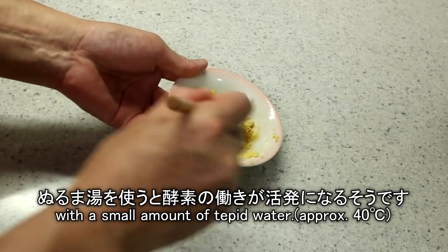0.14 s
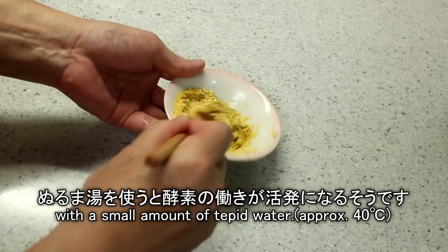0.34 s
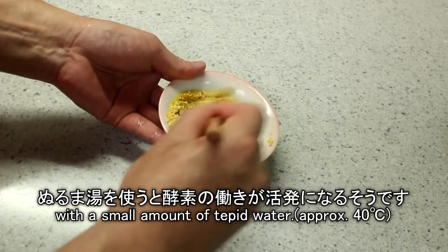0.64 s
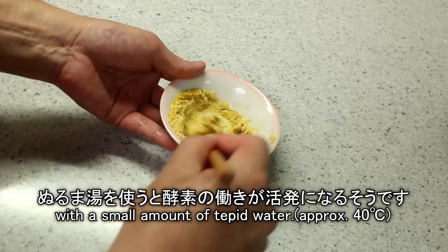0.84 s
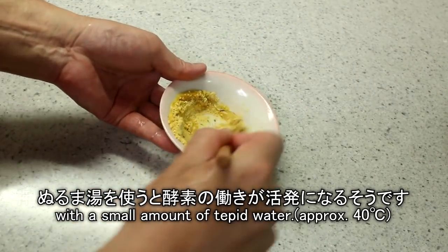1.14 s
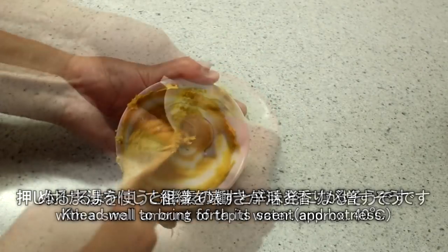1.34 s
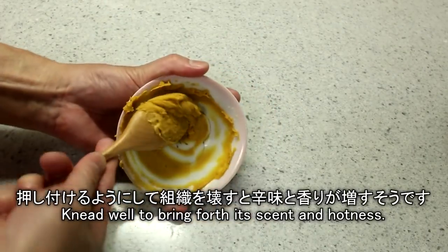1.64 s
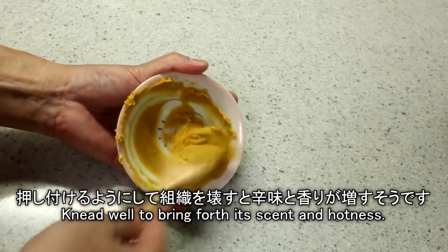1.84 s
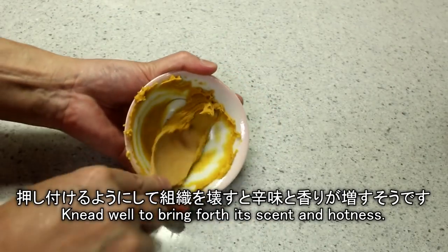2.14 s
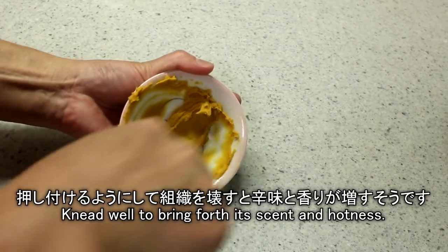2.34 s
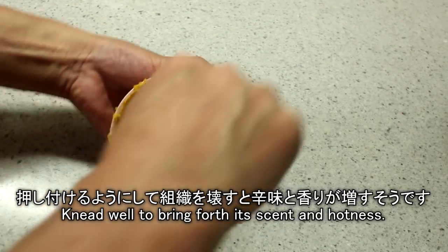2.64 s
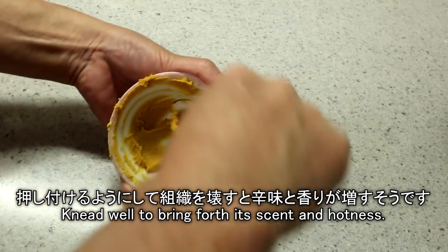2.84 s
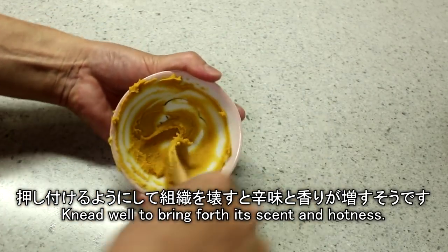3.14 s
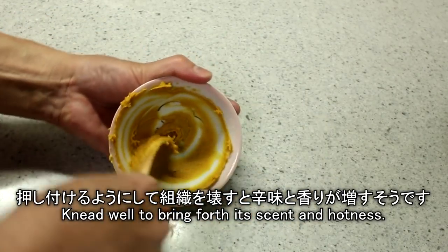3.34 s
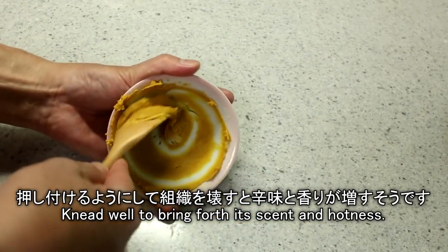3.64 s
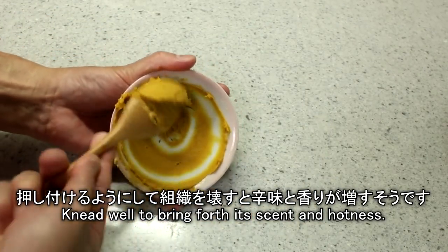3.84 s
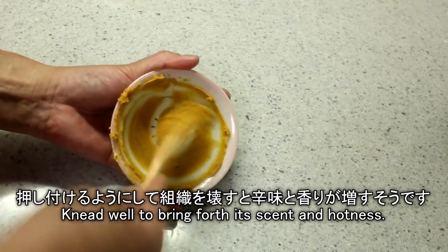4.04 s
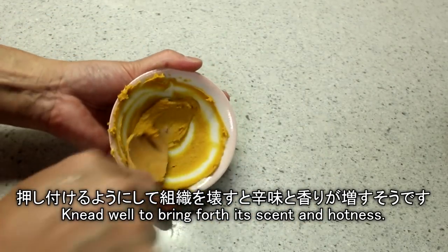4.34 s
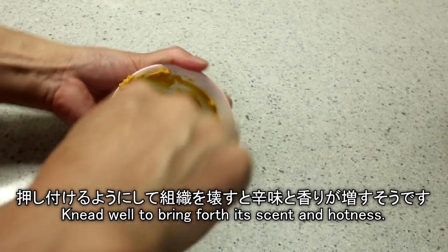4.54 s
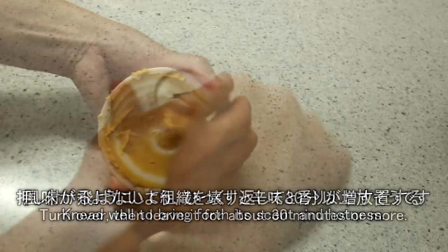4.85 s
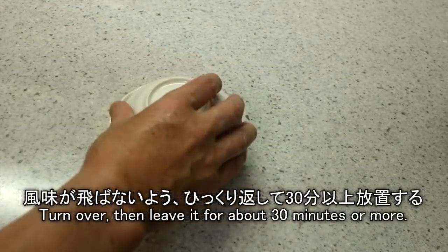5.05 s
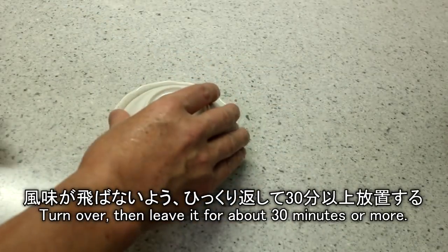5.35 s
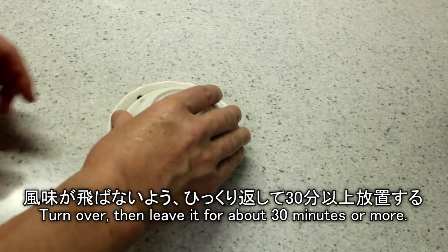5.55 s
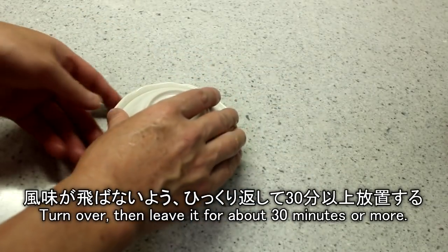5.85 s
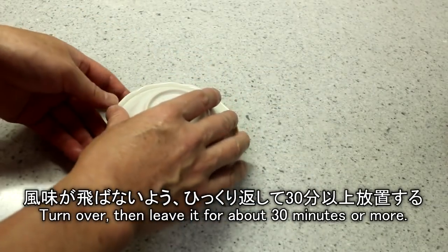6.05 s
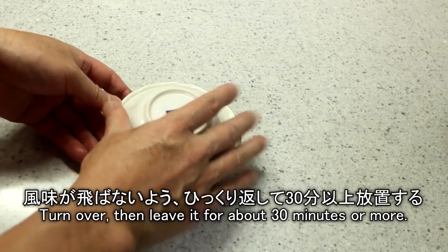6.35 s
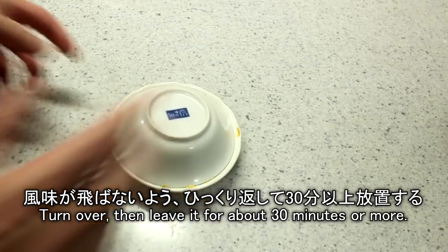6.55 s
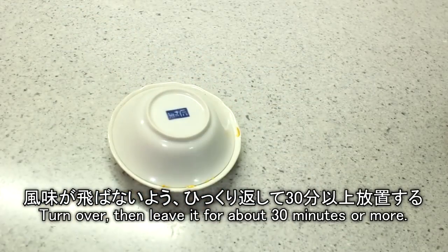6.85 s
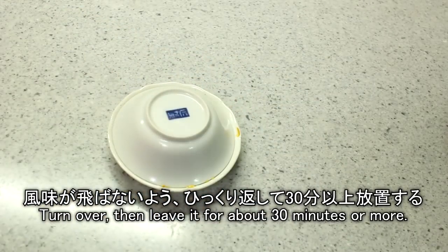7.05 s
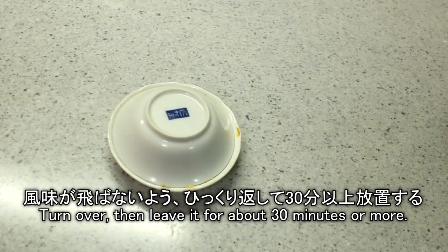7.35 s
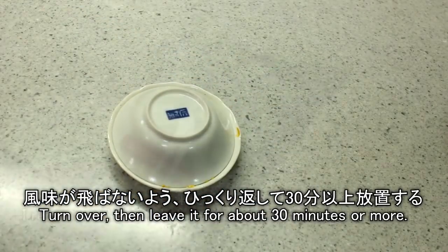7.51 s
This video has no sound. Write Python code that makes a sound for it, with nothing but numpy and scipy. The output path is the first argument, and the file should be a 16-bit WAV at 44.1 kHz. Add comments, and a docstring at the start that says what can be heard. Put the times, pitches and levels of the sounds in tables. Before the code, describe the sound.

Close up in a quiet kitchen with low appliance hum and faint hiss, a wooden spoon kneads thick paste in a small ceramic bowl. Soft wet crackles and tiny sharp pops mix with short, gritty, slightly hollow scrapes. Then the bowl is turned over, its rim clacking loudly twice on the hard counter, followed by dull knocks, light ticks and soft grating. Finally, a faint rustle as the arms withdraw.

```python
"""In a quiet kitchen with appliance hum and hiss, paste is kneaded in a small ceramic bowl, close to the microphone.
The paste smears and crackles (random grains), air pockets pop (decaying noise bursts), and meanwhile a wooden
spoon drags over the glaze (stick-slip grains through resonances). The bowl is turned over: its rim clatters on the
countertop (decaying modes), with dull knocks (modes and noise) and soft grating as it is nudged into place.
Last, the arms draw back with a soft rustle (coloured grains)."""
import sys
import numpy as np
from scipy import signal
from scipy.fft import rfft, irfft
from scipy.io import wavfile
from scipy.ndimage import map_coordinates

SR = 44100
rng = np.random.default_rng(int(sys.argv[2]) if len(sys.argv) > 2 else 0)


def wrap_up_sound(samples):
    """Save the sound to the file named by the first command line argument, as 16-bit audio."""
    columns = np.atleast_2d(samples).T
    # keep every value between -1 and 1, then stretch to whole-number steps
    tamed = np.clip(columns, -1, 1)
    steps = np.round(tamed * 32767).astype(np.int16)
    wavfile.write(sys.argv[1], SR, steps)


N = 338688
FREQS = np.fft.rfftfreq(N, 1 / SR)
RING = np.arange(SR // 2) / SR  # time since a contact, in s

# likeness of left and right in the diffuse room sound: freq_hz, likeness (0-1)
ROOM_LIKENESS = [(60, .65), (400, 0.53), (1400, 0.28), (4000, 0.042), (15000, 0.044)]
# likeness of left and right for rubbing in or under the bowl: freq_hz, likeness (0-1)
SPOON_LIKENESS = [(100, .6), (1400, 0.85), (3000, 0.71), (7000, 0.25), (15000, 0.235)]


def amp(db):
    """Level in decibels to a pressure ratio."""
    return 10 ** (np.asarray(db) / 20)


def evened(x):
    """Normalises the mean power: scales to rms 1."""
    return x / np.sqrt(np.mean(x ** 2) + 1e-20)


def read(points, hz):
    """Interpolates a spectrum on a log-frequency axis, as pitch is heard."""
    f, value = np.transpose(points)
    return np.interp(np.log(hz + 1), np.log(f + 1), value)


def bumps(peaks):
    """Broad damped resonances, as a sum of bell-shaped dB curves."""
    return sum(db / (1 + (2 * (FREQS - hz) / width) ** 2) for hz, width, db in peaks)


def add(mix, s, sound):
    """Superposition: mixes a sound in at time s, cut off at the end."""
    part = mix[:, max(round(s * SR), 0):][:, :sound.shape[-1]]
    part += sound[..., :part.shape[1]]


def band(x, low_hz, high_hz, order=3):
    """Band limiting by a causal high-pass and low-pass."""
    for hz, kind in (low_hz, "high"), (high_hz, "low"):
        x = signal.sosfilt(signal.butter(order, min(hz, SR / 2 - 100), kind, fs=SR, output="sos"), x)
    return x


def stereo(pair, colour_db, likeness):
    """Interaural coherence: colours two unrelated signals and makes them partly alike."""
    left, other = rfft(pair) * amp(colour_db)
    same = np.clip(read(likeness, FREQS), -1, 1)
    right = same * left + np.sqrt(1 - same ** 2) * other
    return evened(irfft(np.array([left, right]), N))


def grains(per_s, spread_db):
    """Friction as tiny slips at random moments: most are small, a few stand out."""
    size = amp(spread_db * np.minimum(rng.exponential(1, N), 5))
    happens = rng.random(N) < per_s / SR
    return size * happens * rng.standard_normal((2, N))


def wander(hz, size=N):
    """Low-passed noise of rms 1: smooth chance that weakens above about hz."""
    f = np.fft.rfftfreq(size, 1 / SR)
    return evened(irfft(rfft(rng.standard_normal(size)) / (1 + (f / hz) ** 2), size))


def flutter(depth_db, hz):
    """Amplitude modulation by the uneven pressure of the hand."""
    return amp(depth_db * wander(hz))


def travel(pair, share, hz):
    """Time warping: resonances drift as the contact point moves round the bowl."""
    at = np.arange(N) + np.cumsum(share * wander(hz))
    return np.array([map_coordinates(x, [at], order=5, mode="mirror") for x in pair])


def movement(length, db, swell_db, attack_s, release_s):
    """Envelope of one movement of the hand: it takes hold, leans in or eases off, and lets go."""
    t = np.arange(0, length + 6 * release_s, 1 / SR)
    along = np.minimum(t / length, 1)
    # the hand is fastest, and so loudest, halfway through
    arch_db = 2.5 * (np.sin(np.pi * along) - 2 / np.pi)
    hold = amp(db + swell_db * (along - .5) + arch_db)
    release = np.exp(-np.maximum(t - length, 0) / release_s)
    return np.minimum(t / attack_s, 1) * hold * release


def movements(rows, attack_s, release_s):
    """Superposed envelopes of a series of movements, with silence outside them."""
    gain = np.zeros((1, N))
    for s, length, db, swell_db in rows:
        add(gain, s, movement(length, db, swell_db, attack_s, release_s))
    return gain


def kitchen(x, early_db, tail_db):
    """Reverberation: quick reflections off the counter and wall, then a faint short tail."""
    # reverberation time of the tail: freq_hz, t60_s
    decay_times = [(150, 0.45), (600, 0.52), (2000, 0.14), (6000, 0.11), (15000, 0.061)]
    noise = rng.standard_normal((2, 2, len(RING)))
    early = noise[0] * (RING > .002) * np.exp(-RING / 0.011)
    # each frequency of the tail dies at its own rate
    hz, t, z = signal.stft(noise[1] * (RING > .008), SR, nperseg=256)
    fading = z * amp(-60 * t / read(decay_times, hz)[:, None])
    tail = signal.istft(fading, SR, nperseg=256)[1][:, :len(RING)]
    echo = (amp(early_db) * evened(early) + amp(tail_db) * evened(tail)) / np.sqrt(len(RING))
    return x + signal.fftconvolve(x, echo, axes=1)[:, :N]


def room_tone():
    """Stationary coloured noise: appliance rumble, hum and whine, and microphone hiss."""
    # background spectrum: freq_hz, level_db
    tone_colour = [(15, -62), (25, -37), (43, -13), (86, -2), (120, -2), (211, -3), (333, -7), (392, -6),
                   (473, -8), (620, -9.5), (857, -11.5), (1250, -13), (1550, -14), (1730, -15.5),
                   (15800, -16)]
    # appliance hum and whine: freq_hz, width_hz, boost_db
    hum = [(99, 52, 8), (253, 62, 5), (414.3, 30, 6.5), (10830, 150, 2)]
    rms_db = -59
    colour_db = read(tone_colour, FREQS) + bumps(hum)
    return amp(rms_db) * stereo(rng.standard_normal((2, N)), colour_db, ROOM_LIKENESS)


def smear():
    """Shear: the paste tears in fine wet crackles and small bubbles, brighter as the film thins."""
    # spectrum of the crackle: freq_hz, level_db
    smear_colour = [(1000, -14), (3500, -14.5), (5500, -6), (8000, -2), (10000, 0.5), (12500, 1.5),
                    (16000, -7)]
    # pushes that shear the paste: start_s, length_s, level_db, swell_db over the push,
    # thin_db (thinness of the film, as treble)
    pushes = [(0.0, .13, -59.5, -2, -11), (.315, .22, -63.5, -13, -7), (0.715, .22, -63.5, -9, -18),
              (1.136, 0.19, -58.5, 10, -5), (1.342, 0.4, -52.5, -13, -1.5), (1.741, 0.057, -60, 7, 1),
              (2.024, 0.2, -64, -3, -1), (2.238, 0.16, -57.5, 8, 3), (2.407, .19, -61, 1, 5),
              (2.636, 0.17, -57.5, 3, -1.5), (2.852, 0.15, -56.5, 0, -7), (3.0, 0.56, -60, -10.5, 1),
              (3.515, 0.36, -55, 10, 1), (3.908, 0.02, -53, 0, 0), (4.156, 0.377, -62, 11, 4),
              (4.546, 0.078, -52, 3, 3), (4.632, .13, -62, 7, 1), (4.771, 0.066, -47.5, 2, -13),
              (4.86, 0.21, -56.5, 1, -6), (5.095, 0.048, -59, 0, -12), (5.238, 0.022, -55, -5, -9)]
    attack_s, release_s = 0.011, 0.015
    thinning_db = 5  # the treble gains this much as a push spreads the paste
    bubbles_per_s, bubble_db = 40, 5.5  # small air pockets, and their size against the crackle
    bubbles = amp(bubble_db) * grains(bubbles_per_s, spread_db=4.0)
    tears = grains(per_s=7000, spread_db=1.5) + bubbles
    fizz = stereo(tears, read(smear_colour, FREQS), SPOON_LIKENESS)
    treble = irfft(rfft(fizz) / (1 + (11000 / (FREQS + 1)) ** 12), N)
    body, film = np.zeros((2, 1, N))
    for s, length, db, swell_db, thin_db in pushes:
        add(body, s, movement(length, db, swell_db, attack_s, release_s))
        add(film, s, movement(length, db + thin_db, swell_db + thinning_db, attack_s, release_s))
    return (body * (fizz - treble) + film * treble) * flutter(depth_db=2.0, hz=59.8)


def pops():
    """Impulsive release: each air pocket snaps with a brief wet fizz and nudges the bowl."""
    # large air pockets bursting in the paste: start_s, level_db (peak, before the left side's boost),
    # pitch_hz, decay_ms (time constant), thump_db (low thump against the snap)
    pockets = [(.319, -43, 9500, 2.9, -18), (.387, -43, 10000, 1.4, -25), (1.3563, -32.5, 9300, 3, -11),
               (1.361, -37, 9600, 2.1, -15), (1.9319, -31.5, 8240, 0.34, -6),
               (2.104, -33, 10600, 0.37, -29), (2.389, -37, 13500, 1.2, -30),
               (2.3965, -35.5, 13400, 2.5, -30), (2.4763, -24.5, 11900, 0.81, -17.5),
               (2.635, -40, 12000, 0.87, -27), (2.681, -26, 7200, 0.91, -16.5),
               (2.982, -31, 2700, 0.99, -1), (3.255, -41, 10000, .4, -20), (3.3096, -42, 2920, 3.6, -3),
               (3.853, -33.5, 11000, 2.5, 0), (3.936, -37.5, 8000, 1.2, -22), (4.3503, -36, 13500, .7, -25),
               (4.4633, -39, 10000, 0.3, -4), (4.6127, -26, 11800, 0.55, -21),
               (4.7317, -36.5, 7740, 2, -10)]
    out, t = np.zeros((2, N)), RING[:2048]
    for s, db, hz, decay_ms, thump_db in pockets:
        burst = rng.standard_normal((2, len(t))) * np.exp(-t / (decay_ms / 10 ** 3))
        snap = band(burst, hz, hz, order=2)
        thump = band(burst, 900, 2470, order=3)
        pop = evened(snap) + amp(thump_db) * evened(thump)
        add(out, s, amp(db) * pop / abs(pop).max())
    return out * amp([[3], [0]])


def drag():
    """Stick-slip of wood on gritty paste and glaze: the tip rasps, the flat back sounds hollow."""
    # spectra of the spoon on its tip and on its flat back: freq_hz, level_db
    tip_colour = [(120, -12), (400, -9.5), (700, -11), (1200, -14), (1750, -2.5), (2200, -4), (4400, -2.5),
                  (5600, -11.5), (10000, -12.5), (16000, -20.5)]
    flat_colour = [(120, 0.5), (450, -4.5), (1000, -1.5), (1400, -3.5), (2200, -6), (4400, -5.5),
                   (5600, -9), (16000, -7)]
    # resonances of the bowl damped by the hand, under tip and flat: freq_hz, width_hz, boost_db
    tip_peaks = [(1780, 350, 5), (2770, 650, 2), (10000, 2200, 2.5)]
    flat_peaks = [(1820, 140, 4.1), (2700, 170, 9.2), (4170, 370, 4.4), (6920, 560, 9.3)]
    # strokes of wood on glaze: start_s, length_s, level_db, swell_db over the stroke,
    # lie of the spoon (0 on its tip to 1 flat)
    strokes = [(1.177, 0.16, -61, 7, 0.44), (1.344, 0.04, -51.5, 3, .25), (1.408, 0.31, -51.5, -1, 0.04),
               (2.247, 0.099, -65, 12, 0.45), (2.73, .23, -62, 0, .3), (3.003, 0.22, -56, -4, 0.72),
               (3.208, 0.36, -58.5, 1.5, 0.91), (3.518, 0.2, -56.5, -2, 1), (3.709, 0.2, -55, 7.5, 0.39),
               (4.365, 0.062, -60, -3, 0.75), (4.578, 0.065, -66, 3, 1), (4.725, 0.29, -64.5, 8, 0.59),
               (4.967, 0.12, -56.5, -9, 0.72), (5.101, 0.044, -59, -2, 0.39)]
    attack_s, release_s = 0.011, .018
    tip_db = read(tip_colour, FREQS) + bumps(tip_peaks)
    flat_db = read(flat_colour, FREQS) + bumps(flat_peaks)
    tip = stereo(grains(per_s=13000, spread_db=1.5), tip_db, SPOON_LIKENESS)
    flat = stereo(grains(per_s=9000, spread_db=2.0), flat_db, SPOON_LIKENESS)
    on_tip, on_flat = np.zeros((2, 1, N))
    for s, length, db, swell_db, lie in strokes:
        force = movement(length, db, swell_db, attack_s, release_s)
        lie = np.clip(lie, 0, 1)
        add(on_tip, s, np.sqrt(1 - lie) * force)
        add(on_flat, s, np.sqrt(lie) * force)
    rub = on_tip * travel(tip, share=.03, hz=8.4) + on_flat * travel(flat, share=.025, hz=5)
    return rub * flutter(depth_db=2.54, hz=45.5)


def clinks():
    """Modal excitation: where the rim lands decides which modes ring; chatter on the counter roughens them."""
    # the bowl's modes: freq_hz (before stiffening), t60_s, near_db (when the near rim lands),
    # far_db (when the far rim lands)
    bowl_modes = [(2005, .115, -15, -44), (2046, .26, -33, -35), (4076, .28, -31, -60),
                  (4328, .12, -62, -31), (8825, .1, -39, -54), (2374, .06, -38, -28), (2610, .13, -32, -48),
                  (4230, .1, -66, -38), (4850, .1, -70, -42), (5080, .14, -74, -44), (6310, .11, -64, -40),
                  (6450, .1, -70, -33), (6590, .07, -72, -40), (8990, .11, -56, -38), (11830, .1, -80, -35),
                  (12895, .13, -50, -43), (15030, .09, -85, -42)]
    # rim touching the counter: start_s, strength_db, far (share of the far rim, 0-1), rattle (0-1),
    # stiff (stiffening, as a factor on pitch)
    contacts = [(5.245, -39, 0.8, .5, 1), (5.3219, -27, 0.2, 0.6, 1), (5.3431, 0, 0, .1, 1),
                (5.428, 0, 1, .65, 1), (5.5314, -23.5, 1, 0.6, 0.96), (5.586, -25.5, 1, .7, 0.99),
                (5.8682, -23, 1, 0.7, 0.96), (5.9021, -28.5, 1, 0.3, 1.03), (5.995, -35, 0.87, .6, 0.99),
                (6.0732, -31, 1, 0.7, 1.02), (6.1186, -33, 0.9, .7, 1.06), (6.225, -33, 0.97, .6, 1.05),
                (6.325, -34, 1, .7, 1.1)]
    out = np.zeros((2, N))
    hz, t60, near_db, far_db = np.transpose(bowl_modes)[:, :, None]
    for s, db, far, rattle, stiff in contacts:
        far = np.clip(far, 0, 1)
        # high modes radiate unevenly, so they reach the two ears out of step
        phase = rng.standard_normal((2, len(hz), 1)) * np.minimum((hz / 8000) ** 2, .6)
        jitter = np.array([wander(hz=130, size=len(RING)) for _ in hz])
        chatter = rattle * jitter * np.minimum(hz / 4500, 1)
        modes = np.sin(2 * np.pi * hz * stiff * RING + phase + chatter) * amp(-60 * RING / t60)
        strength = (1 - far) * amp(near_db) + far * amp(far_db)
        ring = (strength * modes).sum(1)
        add(out, s, amp(db) * band(ring, 1200, 18000))
    return out


def echoed(x):
    """Specular reflection: adds the delayed echoes of nearby hard surfaces."""
    # echoes of the bowl from counter and wall: delay_ms, left_db, right_db
    reflections = [(2.99, -14, -14), (5.5, -14, -17), (9.98, -14, -14), (12.46, -15, -15)]
    out = x.copy()
    for ms, left_db, right_db in reflections:
        add(out, ms / 10 ** 3, x * amp([[left_db], [right_db]]))
    return out


def knocks():
    """Impact: blows ring the countertop; bare rim is hard and bright, a cushioned landing is dull."""
    # modes of the countertop with the air under the bowl: freq_hz, level_db, t60_s
    slab_modes = [(126, -1, .2), (150, 2.5, 0.3), (197, -4.5, .1), (237, -16, 0.054), (279, 1, 0.15),
                  (312.5, 7.5, 0.029), (383, 0.5, .19), (587, 2, .12), (597, -17.5, 0.1012),
                  (793, -5.5, .1), (856, -6, 0.13), (901, -4, 0.1466), (1002, -22, 0.16),
                  (1101, 1.5, 0.026), (1286, -29.5, 0.1585), (1410, -10, 0.07), (1598, -14, 0.16)]
    # blows on the counter: start_s, level_db, low_hz, high_hz (edges of the main band)
    blows = [(5.311, -52.5, 613, 2480), (5.3216, -31.5, 686, 1400), (5.3428, -26, 940, 3060),
             (5.3735, -32.5, 770, 1580), (5.388, -40, 1180, 3486), (5.4069, -35, 890, 1520),
             (5.428, -34, 780, 2040), (5.45, -37.5, 650, 1260), (5.5321, -53, 670, 1220),
             (5.5855, -28.5, 192.6, 710), (5.6485, -56, 403, 1100), (5.7478, -47, 496, 1110),
             (5.9021, -38.5, 187, 1040), (6.2169, -49, 150, 1000), (6.222, -45.5, 150, 870),
             (6.301, -58, 300, 1590), (6.4324, -49, 130, 1280)]
    # air booming under the bowl, mostly lower as the gap closes: start_s, level_db, pitch_hz, t60_s
    booms = [(5.3445, -22.5, 1175, 0.1), (5.4284, -18.5, 901, 0.054), (5.587, -23.5, 550, 0.047),
             (5.749, -28, 608, 0.064), (6.222, -43, 614, 0.07), (6.435, -41, 429, 0.091)]
    out = np.zeros((2, N))
    slab = sum(amp(db - 60 * RING / t60) * np.sin(2 * np.pi * hz * RING) for hz, db, t60 in slab_modes)
    for s, db, low_hz, high_hz in blows:
        noise = rng.standard_normal((3, len(RING)))
        # the many short-lived modes: the higher the blow's band, the sooner they die
        crowd_t60 = 0.067 * (1200 / high_hz) ** .35
        crowd = (noise[0] + .3 * noise[1:]) * amp(-60 * RING / crowd_t60)
        click = amp(33.5) * (RING == 0)
        struck = slab + amp(21.5) * crowd + click
        weight = amp(-20) * band(struck, 100, 300, order=2)  # every blow also shakes the cabinet
        blow = band(band(struck, low_hz, high_hz) + weight, 80, 3900, order=8)
        add(out, s, amp(db) * blow / np.std(blow[:, :SR // 50]))
    for s, db, hz, t60 in booms:
        boom = amp(db - 60 * RING / t60) * np.sin(2 * np.pi * hz * RING)
        add(out, s, band(boom, 200, 3000, order=2))
    return out


def slide():
    """Sliding friction: the upturned rim grates softly on the counter."""
    # spectrum of the grating: freq_hz, level_db
    slide_colour = [(120, -0.5), (400, 4.5), (900, 2), (1500, -4.5), (2500, -9.5), (6000, -19.5),
                    (16000, -17)]
    # bowl singing faintly: freq_hz, width_hz, boost_db
    slide_peaks = [(2107, 180, -4), (4230, 210, 16.5), (6500, 400, 9.5)]
    # shoves that slide the rim over the counter: start_s, length_s, level_db, swell_db over the shove
    shoves = [(5.5, 0.062, -52.5, 11.5), (5.77, 0.12, -57.5, 6), (6.06, .025, -57.5, -4),
              (6.11, 0.034, -60, 11.5), (6.31, .11, -65.5, 0.5)]
    colour_db = read(slide_colour, FREQS) + bumps(slide_peaks)
    grate = stereo(grains(per_s=1700, spread_db=1.5), colour_db, SPOON_LIKENESS)
    return grate * movements(shoves, attack_s=0.011, release_s=0.031)


def rustle():
    """Soft friction, as dense coloured grains, as the arms draw back."""
    # spectrum of the rubbing: freq_hz, level_db
    rustle_colour = [(300, 3), (1500, -7), (4000, -0.5), (9000, 1), (16000, -2)]
    # sweeps of the arms: start_s, length_s, level_db, swell_db over the sweep
    sweeps = [(6.68, 0.12, -66.5, 1), (6.82, 0.21, -62.5, -5), (7.1, 0.24, -60, -3.5),
              (7.42, 0.16, -65.5, -2), (7.635, 0.045, -60.5, 6)]
    rub = stereo(grains(per_s=12000, spread_db=2.0), read(rustle_colour, FREQS), ROOM_LIKENESS)
    return rub * movements(sweeps, attack_s=0.018, release_s=0.052)


def scene():
    """Level and time differences between the ears place spoon and bowl slightly to the left."""
    kneading = (drag() + smear()) * amp([[.4], [-1.6]]) + pops()
    spoon = kitchen(kneading, early_db=-8.5, tail_db=-13.5)
    bowl = kitchen(echoed(clinks()) * amp([[0], [-2]]), early_db=-14, tail_db=-14)
    counter = kitchen(knocks(), early_db=-19.5, tail_db=-18.0)
    left, right = spoon + bowl + counter + slide()
    left_lead = 2  # samples by which the right side lags
    late_right = np.pad(right, (left_lead, 0))[:N]
    return np.array([left, late_right]) + rustle() + room_tone()


def record(dry):
    """Band limit of the recorder, as a linear-phase low-pass."""
    edge_hz = 15900
    low_pass = signal.firwin(511, edge_hz, window=("kaiser", 9), fs=SR)
    return signal.oaconvolve(dry, low_pass[None], "same")


dry = scene()
out = record(dry)
wrap_up_sound(out)
```